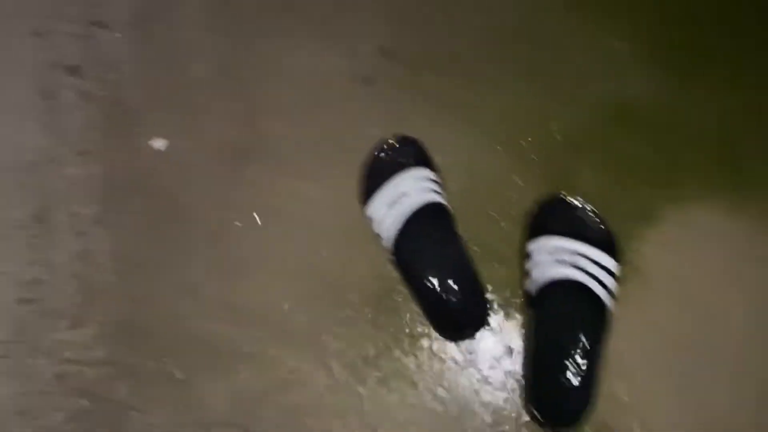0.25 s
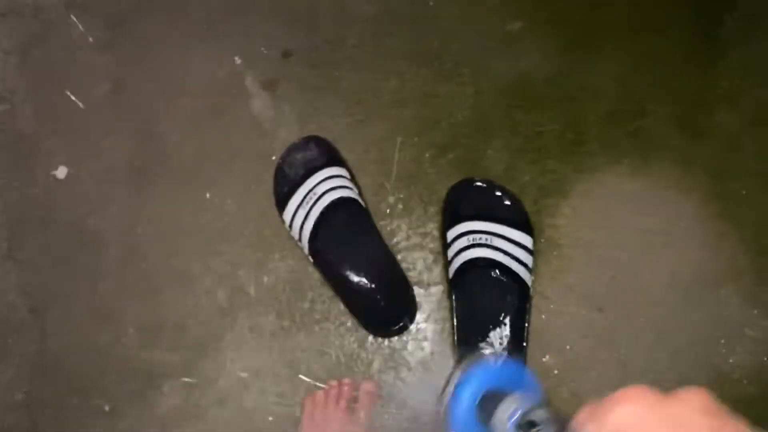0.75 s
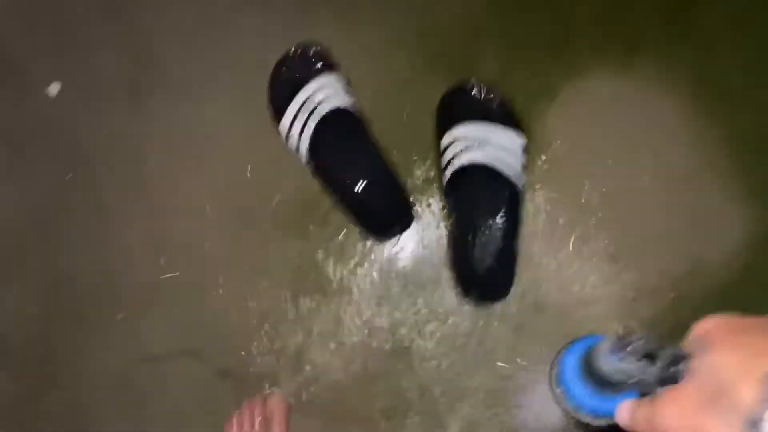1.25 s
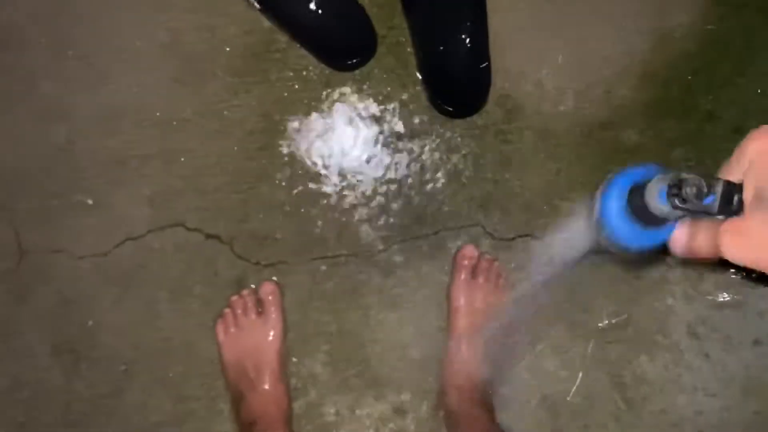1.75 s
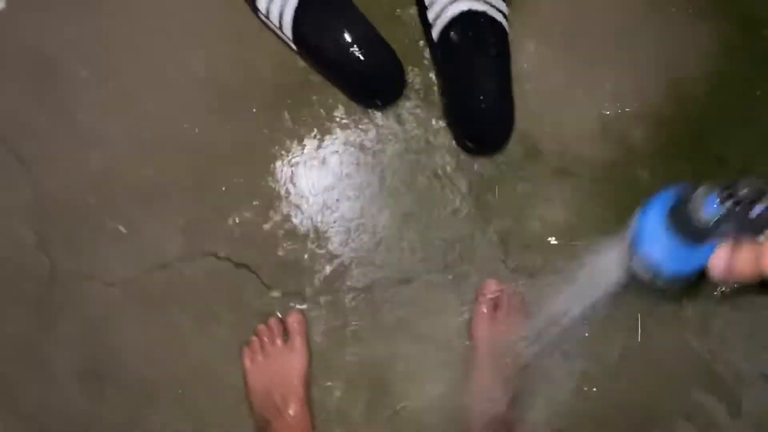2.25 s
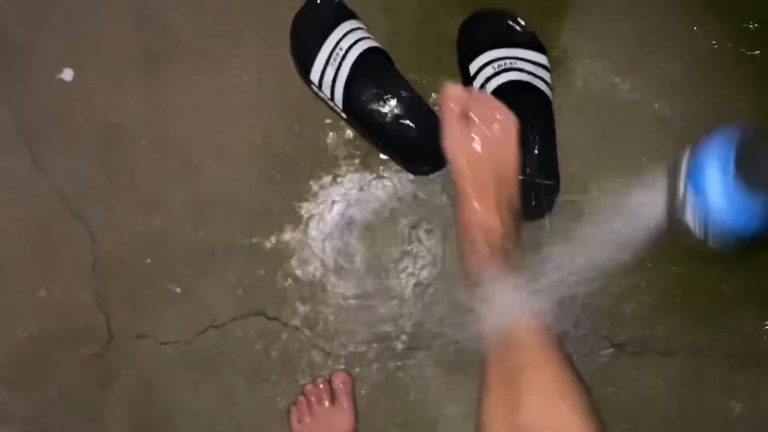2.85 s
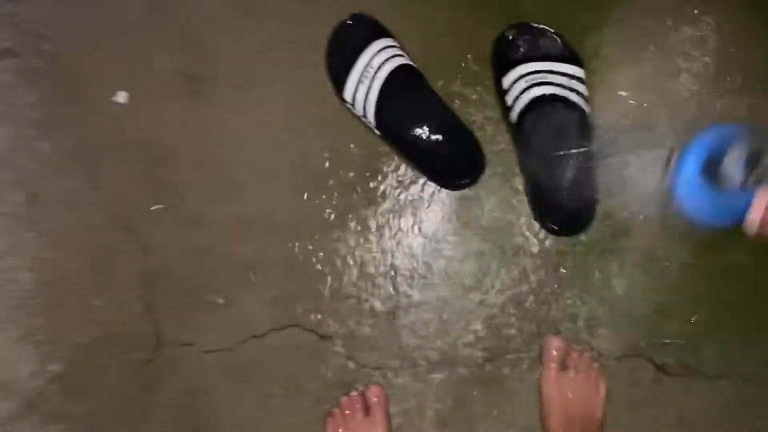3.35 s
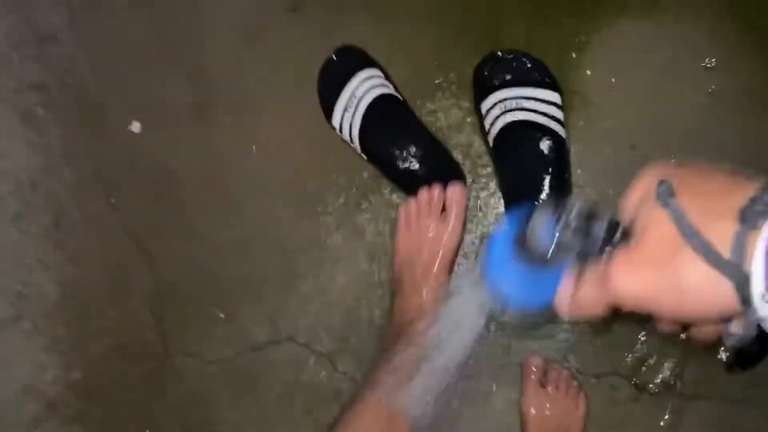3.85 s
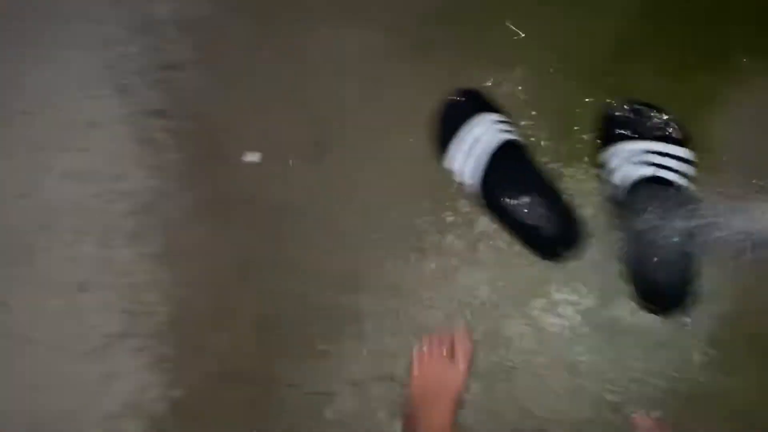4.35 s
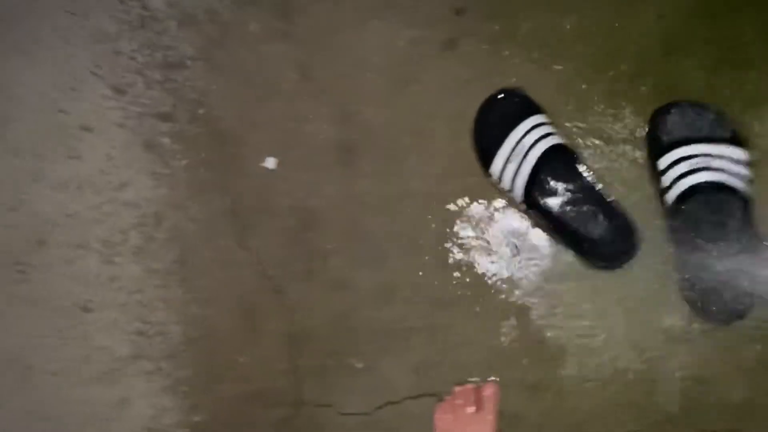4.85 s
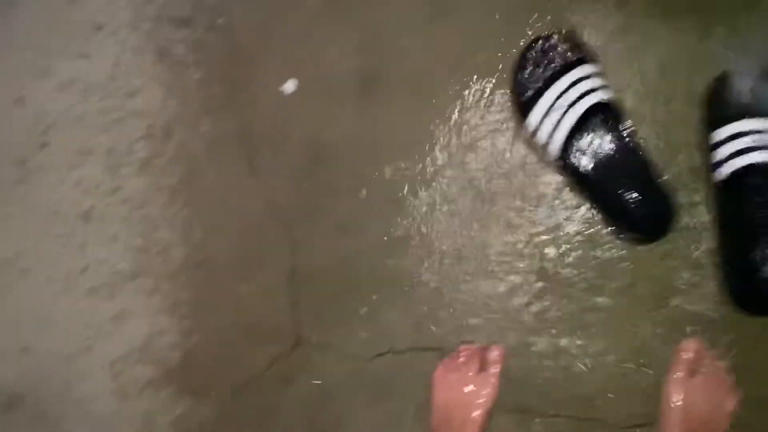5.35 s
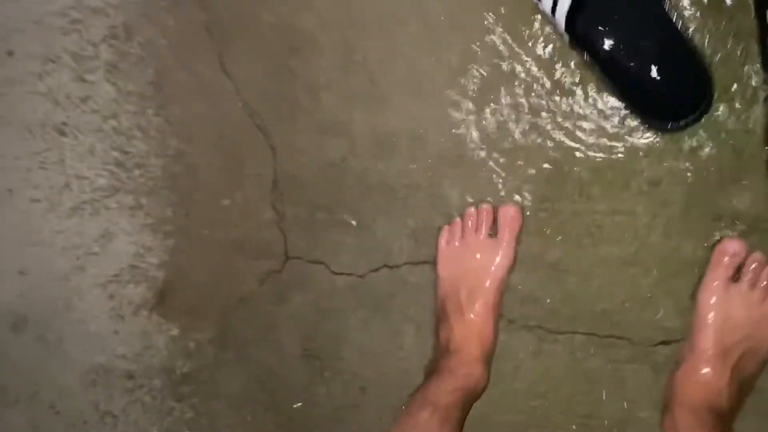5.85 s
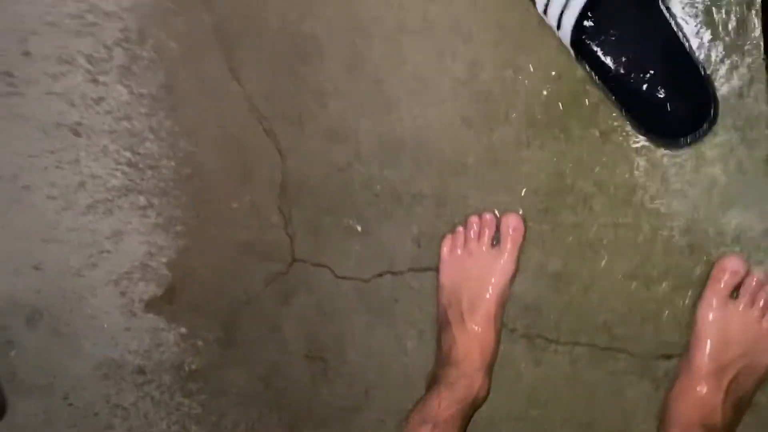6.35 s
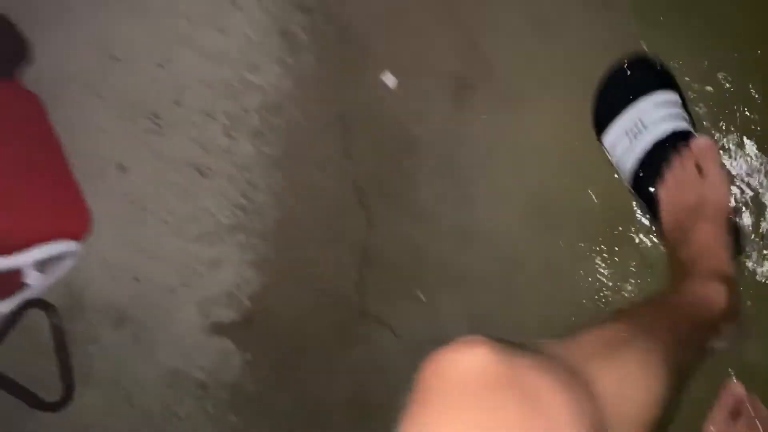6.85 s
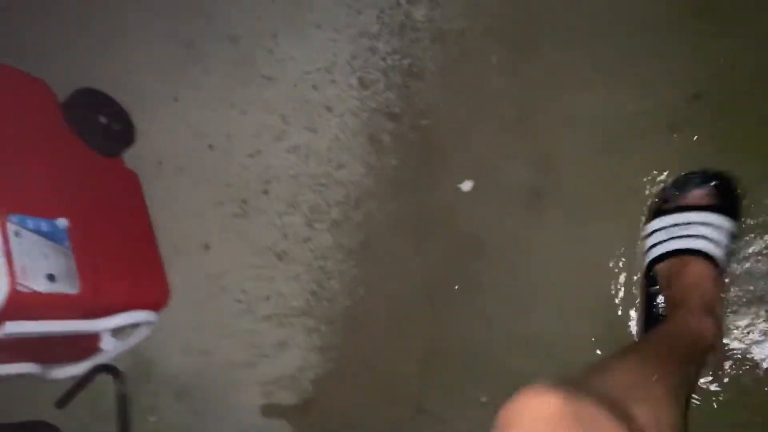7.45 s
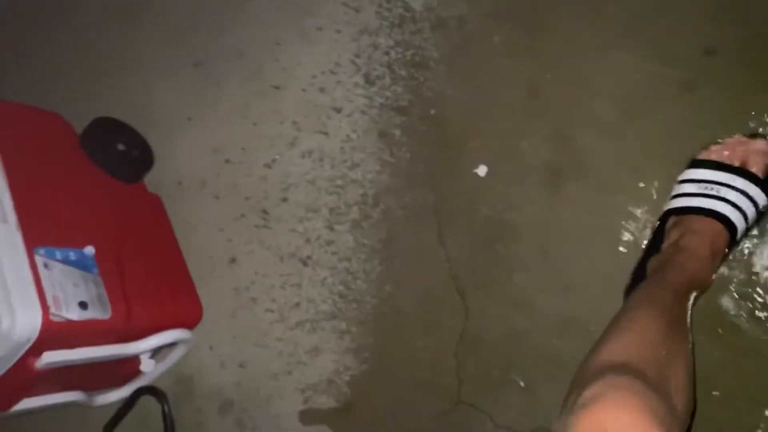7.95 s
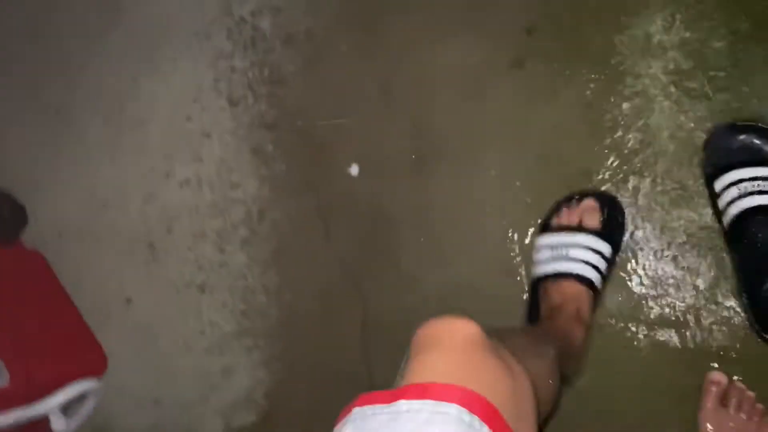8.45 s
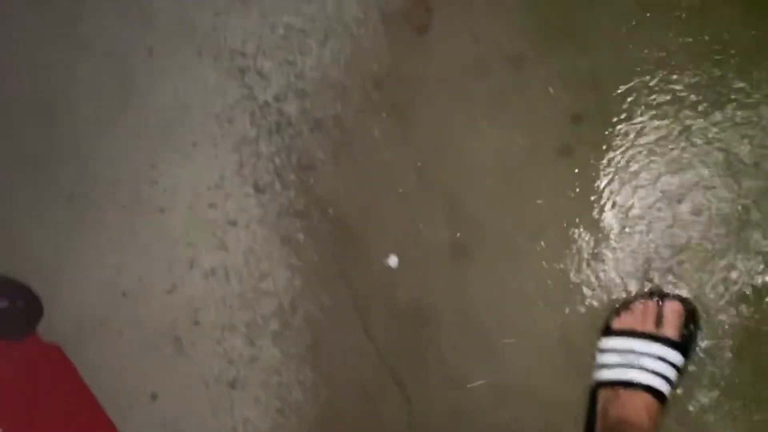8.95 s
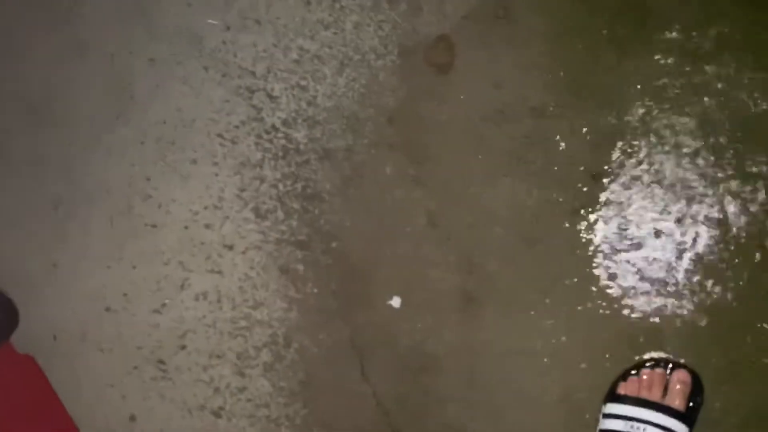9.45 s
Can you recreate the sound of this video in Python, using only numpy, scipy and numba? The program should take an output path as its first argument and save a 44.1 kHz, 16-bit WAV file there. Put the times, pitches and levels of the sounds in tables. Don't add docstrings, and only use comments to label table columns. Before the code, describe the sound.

A hose jet hisses and crackles on wet concrete, drumming hollowly over rubber sandals and feet, with a brief squeak before turning away into drips.

```python
import sys
import numpy as np
from scipy import signal
from scipy.fft import rfft, irfft
from scipy.io import wavfile
from scipy.ndimage import uniform_filter1d
from numba import njit

SR = 44100
rng = np.random.default_rng(int(sys.argv[2]) if len(sys.argv) > 2 else 0)


def boost_factor(decibels):
    exponent = np.asarray(decibels, float) / 20
    return 10 ** exponent


def unload_wav(signal):
    wavfile.write(
        sys.argv[1],
        SR,
        np.round(np.clip(np.atleast_2d(signal).T, -1, 1) * 32767).astype(np.int16),
    )


N = 427329


def track(table):
    s, *columns = np.transpose(table)
    return [np.interp(np.arange(N) / SR, s, c) for c in columns]


def unit(x):
    return x / np.sqrt(np.mean(x ** 2))


def along_hz(hz, values):
    return np.interp(np.log(np.fft.rfftfreq(N, 1 / SR) + 1), np.log(hz), values)


def colour(x, shape):
    hz, db = np.transpose(shape)
    return unit(irfft(rfft(x) * boost_factor(along_hz(hz, db)), N))


@njit
def svf(x, hz, width_hz):
    y, band, low = np.empty(len(x)), 0., 0.
    for i in range(len(x)):
        g = np.tan(np.pi * hz[i] / SR)
        k = width_hz / hz[i]
        v = (band + g * (x[i] - low)) / (1 + g * (g + k))
        band = 2 * v - band
        low = low + 2 * g * v
        y[i] = k * v
    return y


def both(x, hz, width_hz):
    return np.array([svf(row, hz, width_hz) for row in x])


def walk(rate_hz):
    hold = int(SR / rate_hz)
    steps = np.repeat(rng.standard_normal(N // hold + 1), hold)
    return 1.62 * uniform_filter1d(uniform_filter1d(steps, hold), hold)[:N]


def patter(per_s, spread_db, smear_ms, wash, gust_db):
    hit = rng.random(N) < per_s / SR
    size = hit * boost_factor(np.minimum(spread_db * rng.exponential(size=N), 19))
    decay = np.exp(-1000 / (SR * max(smear_ms, .02)))
    bursts = unit(signal.lfilter([1], [1, -decay], size))
    gusts = boost_factor(gust_db * (0.59 * walk(13) + walk(55)))
    envelope = gusts * np.hypot(bursts, wash) / np.hypot(1, wash)
    return envelope * rng.standard_normal((2, N))


def ports(x, other):
    # Hz, left lead in radians, left minus right in dB, unrelated share 0-1.
    port_rows = [(100, 0, -1, .1), (500, -.7, -2, .35), (1200, -.5, -3, .45), (2000, -.3, -1, .5),
                 (3000, -.2, 0, .42), (5000, -.5, -1, .5), (6600, 0, 0, .45), (9100, 3.14, 0, .3),
                 (12150, 6.28, 0, .3), (15400, 9.42, 0, .3)]
    hz, lead_rad, pan_db, share = np.transpose(port_rows)
    bins_hz = np.fft.rfftfreq(N, 1 / SR)
    half = np.exp(.5j * np.interp(bins_hz, hz, lead_rad)) * boost_factor(along_hz(hz, pan_db) / 2)
    share = np.clip(along_hz(hz, share), 0, 1)
    same = rfft(x) * np.sqrt(1 - share ** 2)
    apart = rfft(other) * share
    return irfft(np.array([(same + apart) * half, (same - apart) / half]), N)


def panned(x, pan_db):
    return x * boost_factor(np.outer([.5, -.5], pan_db))


def aim():
    # start in seconds, strength in dB,
    # coarse splash in dB re strength, stray spray on rubber in dB re strength.
    jet_rows = [(0, -28, -11.5, -24.5), (.9, -30, -11.5, -27), (1.05, -25.5, -12.5, -29),
                (1.22, -29.5, -10, -23.5), (1.37, -27.5, -7, -27), (1.46, -30, -13, -26),
                (2.0, -28, -11, -30), (2.16, -28.5, -13.5, -28), (2.75, -30, -13, -25.5),
                (3.8, -29, -12, -26.5), (4.5, -29.5, -12, -19.5), (6.3, -30.5, -6, -13.5),
                (6.55, -31.5, -9.5, -18.5), (7.29, -30.5, -8.5, -23.5), (7.42, -32.5, -7, -15.5),
                (8.82, -31, -9.5, -24.5), (8.98, -38, -7, -32), (9.69, -38.5, -1.5, -11.5)]
    # middle in seconds, hold in seconds, level in dB,
    # hollow resonance in Hz, skin slap in dB re level.
    crossings = [(.545, .03, -41, 950, 4), (0.801, 0.043, -36.5, 910, 1), (2.06, 0.026, -43.5, 1100, 3.5),
                 (2.651, 0.036, -41, 1000, 0.5), (2.924, 0.034, -35, 960, -6), (2.982, 0.017, -33, 960, -3),
                 (3.228, 0.035, -42, 980, -1), (3.316, 0.051, -40, 1020, -5.5),
                 (3.665, 0.022, -39.5, 970, 2.5), (3.994, 0.096, -36, 1090, -7.5),
                 (4.303, 0.049, -34, 870, -9.5), (4.708, 0.094, -36, 870, -1),
                 (4.88, 0.13, -40.5, 1090, -4), (5.085, .015, -34, 1080, -6), (5.22, 0.036, -37, 1160, -6),
                 (5.344, 0.096, -33, 915, -9), (5.607, 0.043, -31, 850, -8), (5.903, 0.049, -30, 790, -13),
                 (6.078, 0.11, -35, 1090, -10), (6.193, 0.025, -27, 990, -14), (6.31, 0.15, -35, 980, -3),
                 (7.674, 0.044, -38.5, 960, 2.5), (8.027, 0.49, -37, 1000, -7),
                 (8.638, 0.15, -33, 930, -10)]
    enter_db_s, leave_db_s = 380, 280
    stray_hz, stray_slap_db = 990, 1
    thrown_db = -5
    pool_hz, pool_sag_hz = 4184, 800

    t = np.arange(0, N / SR, .002)
    middle, hold, db, hz, slap_db = np.transpose(crossings)[:, :, None]
    early = np.maximum(middle - hold / 2 - t, 0)
    late = np.maximum(t - middle - hold / 2, 0)
    power = boost_factor(2 * (db - enter_db_s * early - leave_db_s * late))
    rows = power.sum(0), (power * hz).sum(0), (power * boost_factor(2 * slap_db)).sum(0)
    body, pitch, skin = (np.interp(np.arange(N) / SR, t, r) for r in rows)

    jet_db, coarse_db, stray_db = track(jet_rows)
    stray = boost_factor(2 * (jet_db + stray_db + walk(9)))
    coarse = boost_factor(2 * (jet_db + coarse_db + walk(11)))
    thrown = boost_factor(2 * thrown_db) * skin
    pocket_hz = (pool_hz - pool_sag_hz * thrown / (coarse + thrown)) * (1 + .05 * walk(10))
    ground = jet_db + 1.14 * walk(10.5), 10 * np.log10(coarse + thrown), pocket_hz

    hollow_hz = (pitch + stray * stray_hz) / (body + stray) * (1 + 0.064 * walk(14))
    skin_db = 10 * np.log10(skin + stray * boost_factor(2 * stray_slap_db))
    return ground, (10 * np.log10(body + stray), hollow_hz, skin_db)


def jet(mist_db, splash_db, pool_hz):
    # Hz, level in dB.
    mist_shape = [(3500, -30), (5000, -11), (6300, -5), (7300, 0), (10000, 0), (11500, -1.5), (15500, 1),
                  (17000, 1)]
    large_shape = [(7000, 0), (9200, -2), (12000, -11)]
    small_shape = [(7000, -12), (9200, -2.5), (12000, 0)]
    splash_shape = [(300, -9.5), (700, -16.5), (1400, -9), (2200, -4.5), (3000, 0), (4200, -2), (5500, 0),
                    (8000, -12)]
    # time in seconds, Hz, level in dB.
    ring_rows = [(0, 1820, -48), (.9, 1754, -42.5), (1.3, 1720, -49.5), (5, 1710, -44.5), (5.9, 1780, -50),
                 (6.5, 1665, -44), (8.6, 1604, -47), (9, 1700, -58), (9.69, 1710, -56.5)]
    # time in seconds, left minus right in dB.
    splash_pan = [(0, -0.3), (1, -5), (3.07, -3.5), (4.6, -7), (5.1, -8.5), (6.37, -3.5), (6.69, -4),
                  (7.7, -4.5), (9.69, -4)]

    flow = boost_factor(1.5 * (uniform_filter1d(mist_db, SR // 4) + 30.5))
    large = colour(patter(1500, spread_db=5.5, smear_ms=0.28, wash=0.83 * flow, gust_db=1.24), large_shape)
    small = colour(patter(2500, spread_db=5.0, smear_ms=.2, wash=1.1 * flow, gust_db=0.5), small_shape)
    mist = colour(large * np.sqrt(.4) + small * np.sqrt(.6), mist_shape)

    slaps = patter(900, spread_db=3.5, smear_ms=0.53, wash=1.38 * flow, gust_db=1.05)
    pockets = unit(both(slaps, pool_hz, 1200.0))
    splash = unit(colour(slaps, splash_shape) + .5 * pockets)

    ring_hz, ring_db = track(ring_rows)
    ring_hz = ring_hz * (1 + .008 * walk(5))
    turbulence = boost_factor(1.2 * walk(25)) * rng.standard_normal((2, N))
    ring = unit(both(both(turbulence, ring_hz, 200.), ring_hz, 200.))

    fine = boost_factor(mist_db + 5.5) * mist + boost_factor(ring_db) * ring
    coarse = boost_factor(splash_db + 3.5) * splash
    return ports(*fine) + panned(ports(*coarse), *track(splash_pan))


def drum(db, hz, slap_db):
    # Hz, level in dB.
    hollow_shape = [(150, -24.5), (300, -14.5), (450, -7.5), (900, -5), (1500, -1.5), (2000, -23.5),
                    (3000, -27.5), (6000, -29)]
    slugs = patter(700, spread_db=0.0, smear_ms=1.0, wash=0.84, gust_db=1.15)
    resonance = unit(both(both(slugs, hz, 630.0), hz, 630.0))
    body = unit(colour(slugs, hollow_shape) + 0.61 * resonance)
    skin_hz = 2150 * (1 + 0.059 * walk(3.7))
    skin = unit(both(both(slugs, skin_hz, 1400.0), skin_hz, 1400.0))
    return boost_factor(db + 3.0) * body + boost_factor(slap_db + 1.5) * skin


def drizzle(count=36):
    from_s, mean_db, spread_db = 8.84, -30.5, 3
    low_hz, high_hz = 2420, 6600
    when, size, pitch = rng.random((count, 3)).T
    s = from_s + when * (N / SR - from_s)
    db = mean_db + spread_db * (2 * size - 1)
    return list(zip(s, db, low_hz * (high_hz / low_hz) ** pitch))


def drops():
    # start in seconds, peak in dB, pitch in Hz.
    lone_drops = [(1.708, -8.5, 11400), (1.736, -6.5, 11700), (2.154, -9, 11500), (2.2268, -11.5, 11900),
                  (2.3161, -16.5, 6570), (2.568, -12.5, 6600), (2.836, -28, 11500), (2.8469, -13, 11100),
                  (3.7798, -22, 11900), (4.7506, -12, 7500), (5.8077, -18, 6160), (6.9975, -15, 6230),
                  (8.3559, -12, 12000), (8.789, -15.5, 11600), (8.9351, -16, 11500), (9.0134, -20, 11300),
                  (9.0274, -18, 11100), (9.2738, -13, 10800), (9.3387, -21, 6270), (9.5811, -19.5, 6510)]
    heavy_drips = [(8.8936, -18, 6000), (8.907, -21, 3200), (8.9137, -15, 6100), (9.0214, -28.5, 3000),
                   (9.061, -24, 5900), (9.1133, -24, 3080), (9.269, -25, 5800), (9.3037, -28, 5100),
                   (9.366, -23, 5900), (9.5117, -23, 6000), (9.1086, -23.5, 3040), (9.1643, -19, 4100),
                   (9.1896, -20, 2620), (9.231, -21, 3360), (9.3487, -28, 2600), (9.4041, -35, 4030),
                   (9.4275, -30, 4300), (9.4405, -18, 3400), (9.4773, -21, 3660), (9.4944, -20.5, 3100),
                   (9.5777, -23, 4095), (9.5902, -21, 4100), (9.6206, -20, 4270), (9.6542, -19, 3100),
                   (9.667, -17, 4040)]
    plops = [
        (1.239, -25.5, 1200),
        (1.311, -37, 770),
        (1.964, -31.5, 775),
        (2.258, -35, 890),
        (3.4, -34, 800),
        (7.288, -16.5, 1190),
        (7.705, -21, 960),
    ]
    length = 400
    out, t = np.zeros(N + length), np.arange(length) / SR
    rows = lone_drops + heavy_drips + plops + drizzle()
    tails = np.diff(rng.standard_normal((len(rows), length + 1)))
    for (s, db, hz), tail in zip(rows, tails):
        tick = np.sin(2 * np.pi * hz * t) * (t * hz) * np.exp(-t * hz / 1.19)
        crackle = 0.35 * min(hz / 5000, 1) * tail * np.exp(-t / 0.0014)
        start = int(s * SR)
        out[start:start + length] += boost_factor(db + 6.5) * (tick + crackle)
    return out[:N]


def squeak():
    # time in seconds, slip rate in Hz, level in dB.
    slips = [
        (7.625, 990, -36),
        (7.655, 935, -28),
        (7.682, 833, -26),
    ]
    hz, db = track(slips)
    t = np.arange(N) / SR
    gate = np.clip(np.minimum(t - slips[0][0], slips[-1][0] - t) / 0.0071, 0, 1)
    phase = 2 * np.pi * np.cumsum(hz * (1 + .05 * walk(300))) / SR
    second = 0.97 * boost_factor(2.8 * walk(197)) * np.sin(2 * phase)
    tone = np.sin(phase) + second + 0.25 * np.sin(3 * phase)
    return gate * boost_factor(db + 2.5) * tone


def ground_echo(near, wet):
    dip = np.clip(wet * (1 + 0.19 * walk(9)), 0, .75)
    near = near - dip * both(near, 3574 * (1 + .03 * walk(12)), 800.)
    return near + wet * both(near, np.full(N, 6200.), 530.0)


def body_shadow(left, turn):
    low_hz = 2320 + (1358 - 2320) * turn
    low_depth = .4 + (1.7 - .4) * turn
    left = left - low_depth * svf(left, low_hz, 1100.)
    return left - 0.5625 * svf(left, 5060 * (1 + 0.035 * walk(8.8)), 1500.)


def night():
    # Hz, density in dB per Hz.
    rumble_shape = [(15, -52), (25, -21), (70, 0.5), (97, -4.5), (166, -10), (199, -12), (230, -10),
                    (386, -18.5), (560, -25), (703, -20), (1200, -83), (1560, -64), (2640, -120)]
    # Hz, width in Hz, level in dB.
    hum_rows = [(75, 12, -54), (120, 9, -53.5)]
    out = boost_factor(-51) * colour(rng.standard_normal(N), rumble_shape)
    for hz, width_hz, db in hum_rows:
        out += boost_factor(db) * unit(svf(rng.standard_normal(N), np.full(N, 1. * hz), 1. * width_hz))
    return out


def scene():
    # time in seconds, amount 0-1.
    wet_rows = [(0, 0), (5.4, 0.3), (6.4, 0.62), (7.7, .99), (8.4, 0.38), (9.69, 0.83)]
    # time in seconds, turn 0-1.
    turn_rows = [(0, .1), (1, 0), (1.4, 0.19), (3.8, 0), (4.3, 0.87), (4.9, .98), (9.69, 1)]
    ground, bodies = aim()
    beat = panned(ports(*drum(*bodies)), -1.5)
    near = jet(*ground) + beat + ports(drops() + squeak(), np.zeros(N))
    left, right = ground_echo(near, track(wet_rows)[0])
    left = body_shadow(left, track(turn_rows)[0])
    hum, apart = night(), night()
    return np.array([left + .94 * hum + .11 * apart, right + 1.06 * hum - .11 * apart])


def low_pass(x):
    return signal.sosfilt(signal.butter(12, 15780, fs=SR, output="sos"), x)


def record(dry):
    return low_pass(dry)


dry = scene()
out = record(dry)
unload_wav(out)
```